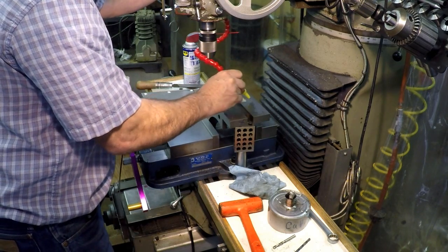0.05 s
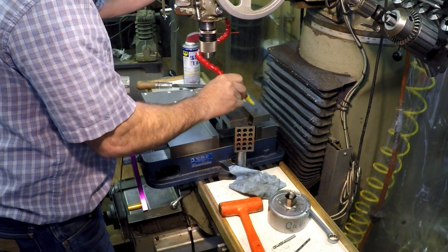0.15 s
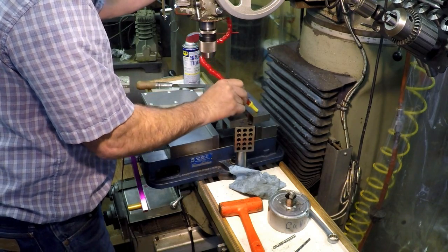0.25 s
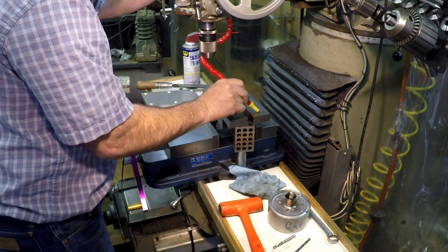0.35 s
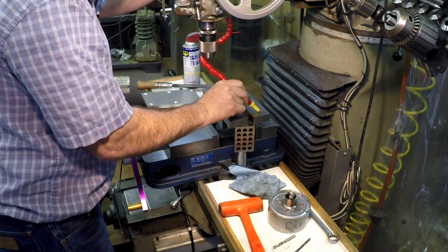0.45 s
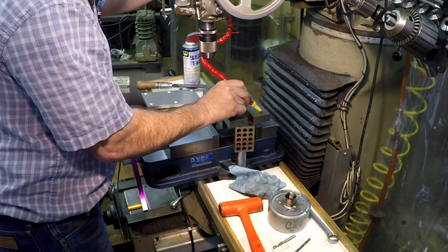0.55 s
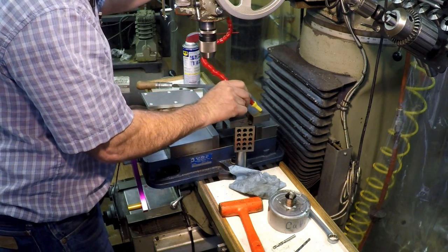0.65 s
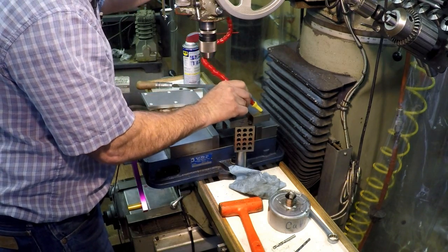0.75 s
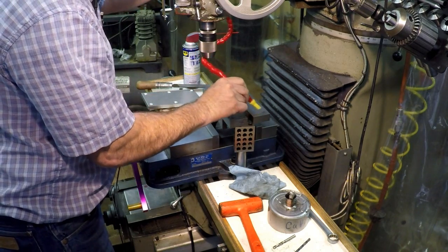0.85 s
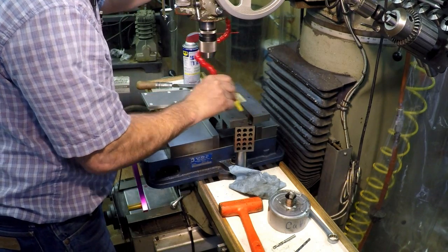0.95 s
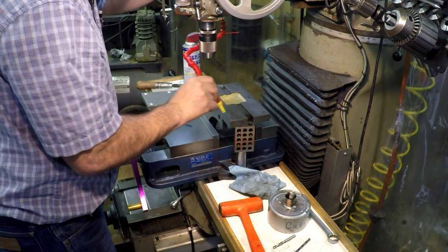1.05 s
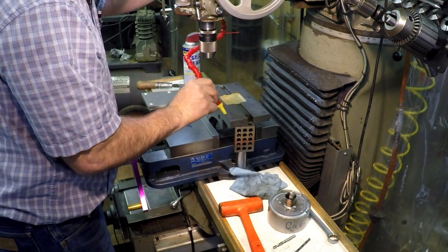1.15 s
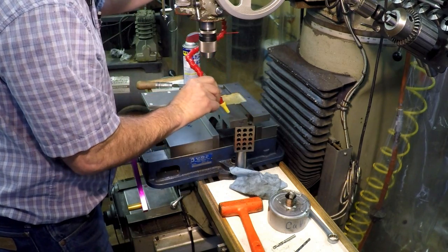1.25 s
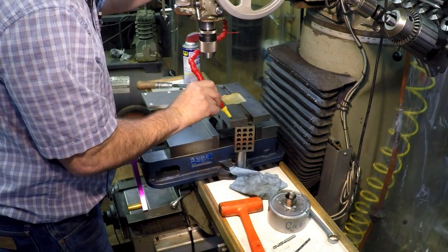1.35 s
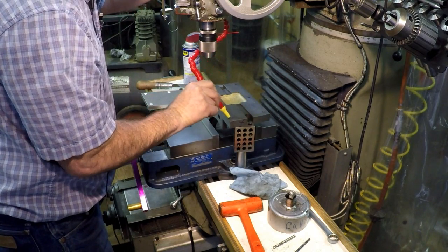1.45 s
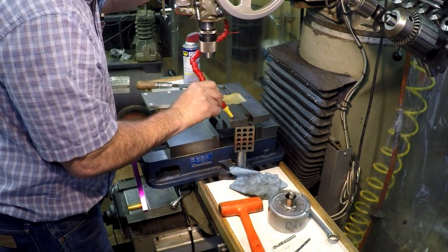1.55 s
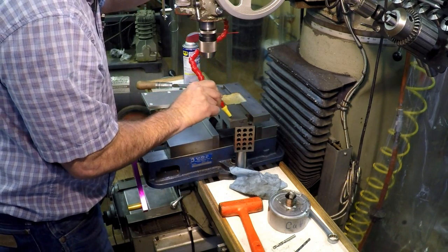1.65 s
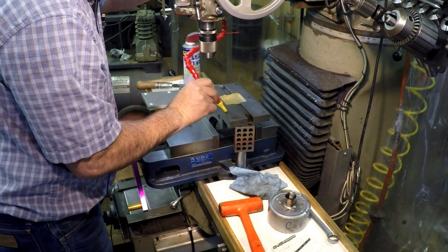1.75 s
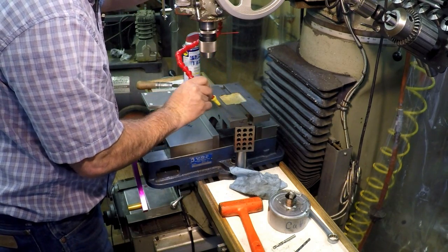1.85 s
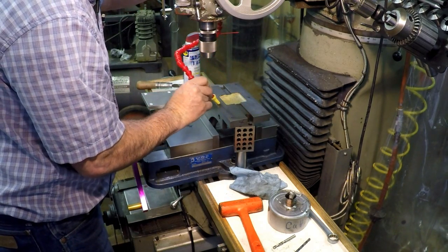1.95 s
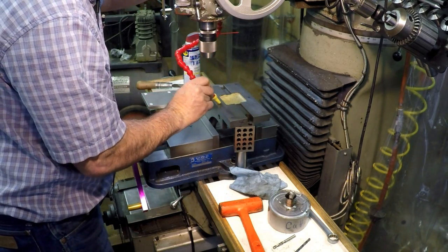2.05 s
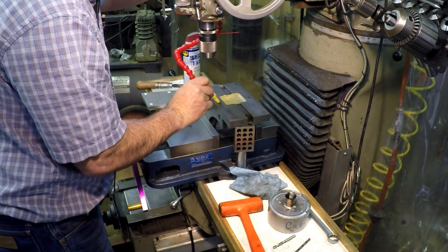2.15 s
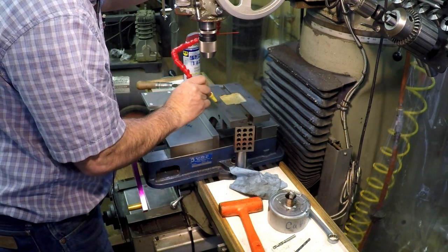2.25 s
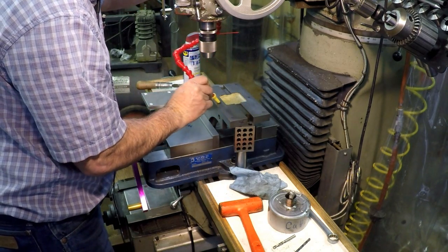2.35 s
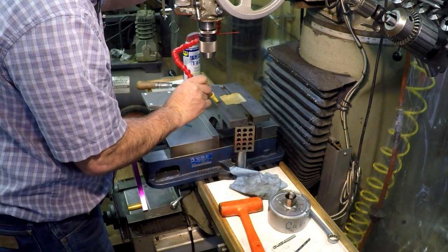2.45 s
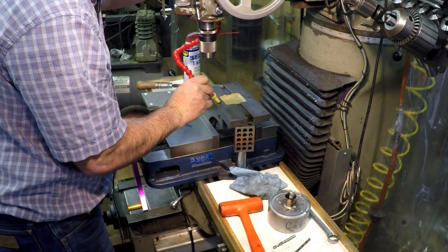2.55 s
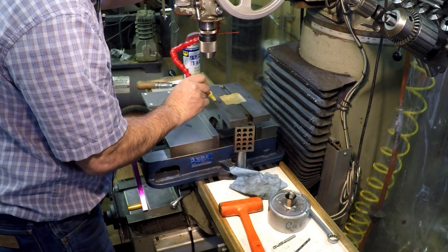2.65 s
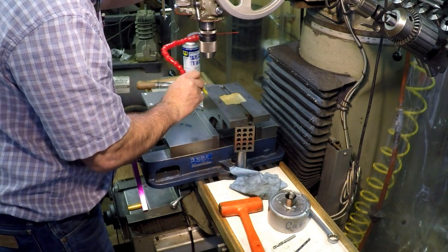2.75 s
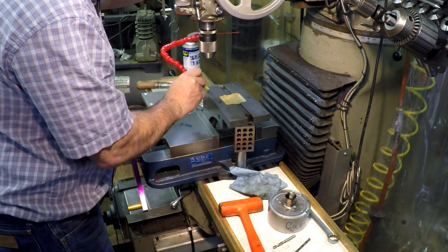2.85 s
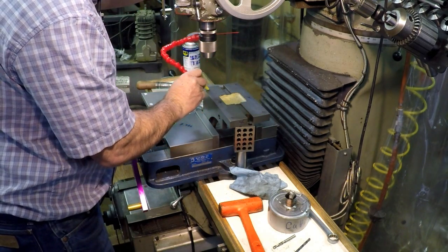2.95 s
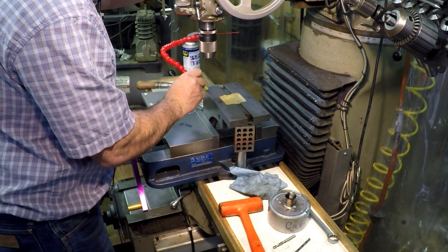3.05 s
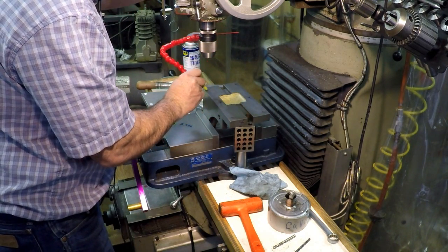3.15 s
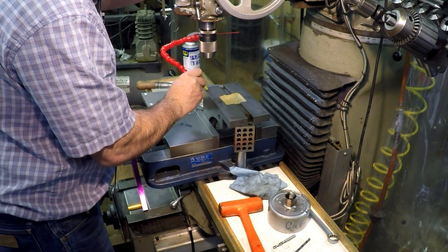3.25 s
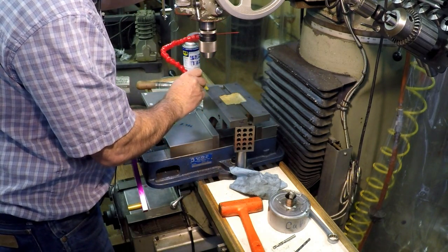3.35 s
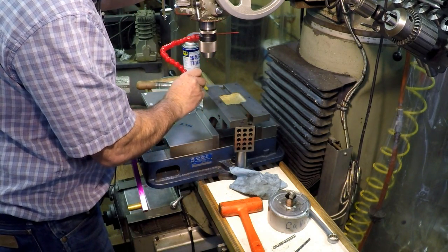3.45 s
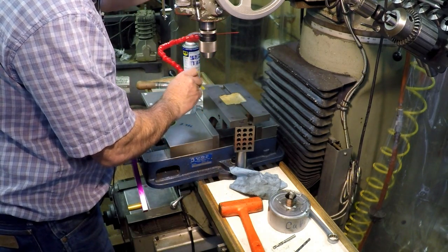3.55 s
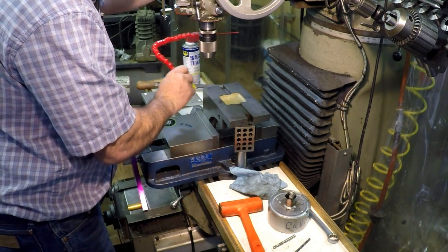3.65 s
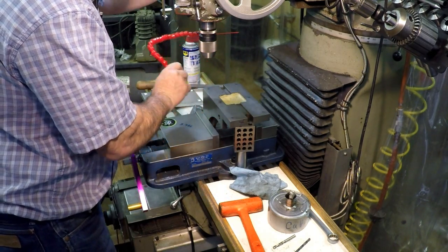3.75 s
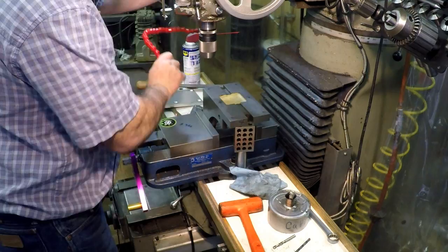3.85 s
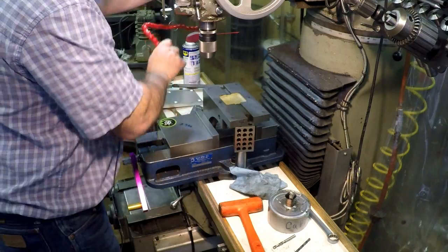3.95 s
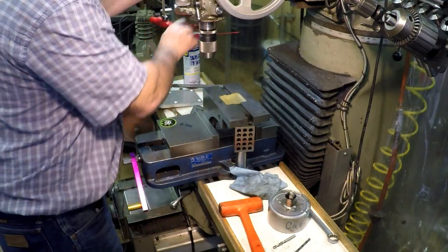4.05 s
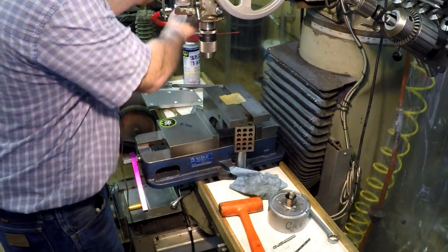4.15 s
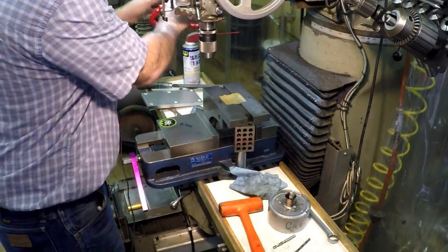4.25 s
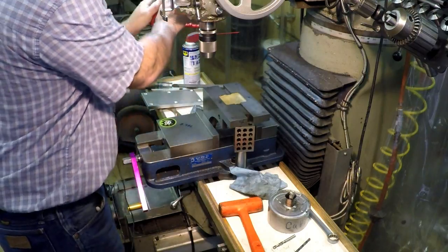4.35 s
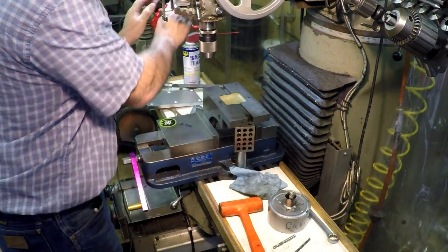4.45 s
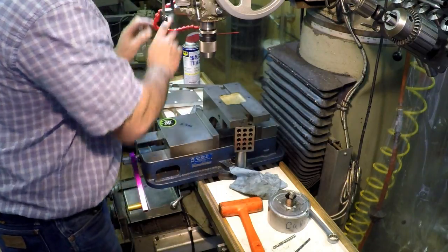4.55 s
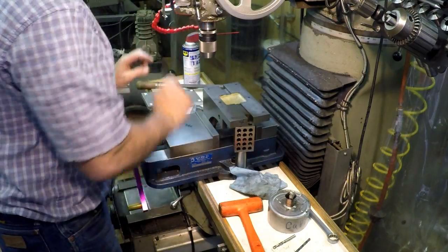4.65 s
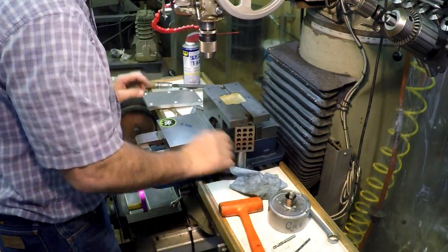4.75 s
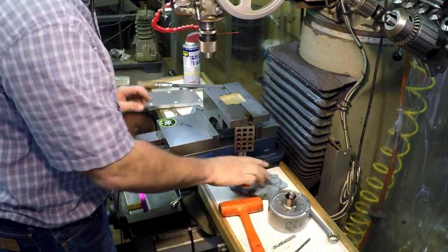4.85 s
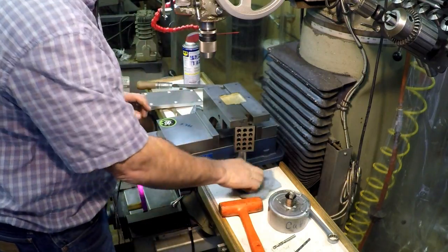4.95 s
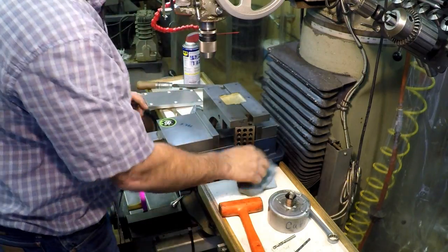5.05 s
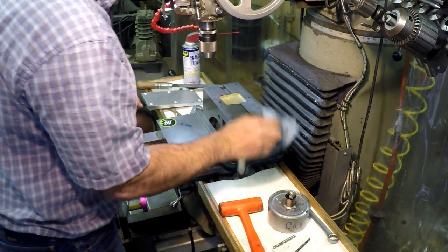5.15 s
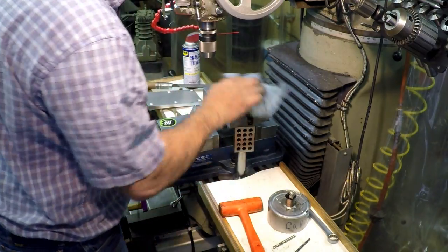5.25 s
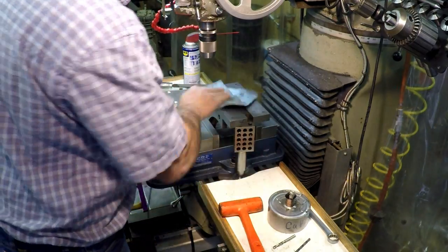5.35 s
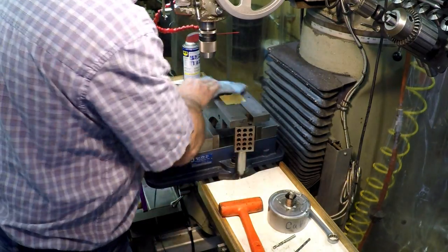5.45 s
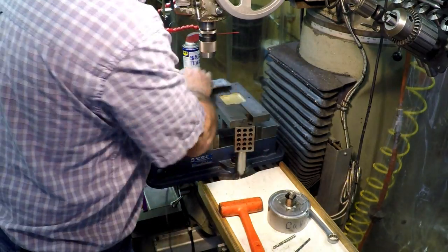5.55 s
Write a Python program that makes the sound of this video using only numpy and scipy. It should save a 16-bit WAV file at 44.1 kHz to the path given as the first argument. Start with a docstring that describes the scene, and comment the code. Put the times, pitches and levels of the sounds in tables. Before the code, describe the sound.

An air nozzle blows in hissing, whistling sweeps across a metal block, followed by plastic hose clicks over faint workshop hum.

```python
"""A machine shop, one mono microphone close enough to the work to catch stray air. A nozzle on a jointed
plastic hose sweeps four times over a drilled steel block. The jet hisses, sizzles on edges, and whistles
near 6 kHz whenever it crosses a hole. The air is shut off, the hose snaps and creaks as it is bent away,
and a rag is snatched from a wooden tray. Shop rumble and mains hum lie underneath."""
import sys
import numpy as np
from scipy import signal
from scipy.fft import rfft, irfft
from scipy.io import wavfile
from scipy.ndimage import uniform_filter1d

SR = 44100
rng = np.random.default_rng(int(sys.argv[2]) if len(sys.argv) > 2 else 0)


def wav_out(sig):
    """Save sig, one row per channel (or a flat mono array), as 16-bit PCM at SR to the path in sys.argv[1]."""
    wavfile.write(sys.argv[1], SR, np.round(np.clip(np.atleast_2d(sig).T, -1, 1) * 32767).astype(np.int16))


N = 247396
T = np.arange(N) / SR

# the jet swells and sinks with each sweep: t/s, rush level/dB, sizzle level/dB, wash level/dB
JET_LEVELS = [(0, -39, -25, -54.5), (.15, -39, -28, -57.5), (.31, -33.5, -33.5, -44), (.4, -35, -34, -47.5),
              (.58, -37.5, -26, -57), (.81, -56.5, -44, -82), (1.03, -57, -51, -70),
              (1.125, -49.5, -47.5, -58.5), (1.45, -42.5, -34, -53.5), (1.62, -43.5, -35, -55),
              (1.7, -53.5, -39.5, -67.5), (1.97, -53.5, -48.5, -64), (2.21, -45, -34, -64),
              (2.45, -43, -32, -55), (2.48, -50, -35, -70), (2.86, -50, -41, -62),
              (2.91, -50.5, -48.5, -47.5), (3.25, -41, -33.5, -47), (3.41, -53, -39.5, -56),
              (3.72, -54, -42.5, -66)]
# spectra of the free rush, the sizzle and the low wash over the vise: f/Hz, level/dB
RUSH_SPECTRUM = [(300, -35), (900, -13.5), (1550, -4), (2300, -7.5), (3400, -1), (4500, 1.5), (6000, -6),
                 (8500, 1), (10500, -4), (12500, -3.5), (15000, -2)]
SIZZLE_SPECTRUM = [(1500, -49), (3500, -20), (4700, -7), (5700, 3.5), (6700, -0.5), (7400, -1), (8600, -4),
                   (10500, -16.5), (15000, -16)]
WASH_SPECTRUM = [(60, -18), (200, -8), (400, -2.5), (900, 0.5), (1400, -6), (2200, -12), (4000, -27.5)]
# resonances of the holes and slots, and of the gap between the vise jaws: f/Hz, width/Hz, level/dB
SLOT_MODES = [(1583, 86, -17), (2653, 98, -14), (3445, 160, -13.5), (4960, 59, -10.5), (7215, 63, -9)]
GAP_MODES = [(416, 31, -13), (729, 140, -12.5), (1244, 120, -4.5), (1300, 48, -3), (1483, 58, -1.5),
             (2686, 170, -26.5), (3510, 190, -6), (5350, 120, -5)]
# the jet strikes a steel edge, or blows into the gap: t/s, length/s, level/dB
EDGE_STRIKES = [(-0.02, 0.12, -24.5), (0.393, 0.26, -32.5), (0.984, 0.022, -35.5), (1.271, 0.028, -39),
                (1.717, .088, -27), (2.719, 0.048, -24)]
GAP_BLOWS = [(2.985, .285, -38.5), (3.281, 0.438, -55)]
# room tone of the shop: f/Hz, level/dB
SHOP_SPECTRUM = [(10, -6.5), (27, 13.5), (60, -10.5), (125, -12), (280, -17), (700, -21.5), (1200, -23.5),
                 (1500, -21.5), (2400, -28), (8000, -31.5), (11500, -38.5), (15000, -35.5)]
# its slow rise and fall: t/s, level/dB
SHOP_LEVEL = [(0, -57.5), (0.6, -58.5), (1.0, -66), (2.0, -62.5), (3.0, -59), (3.85, -61), (4.2, -58),
              (5.6, -57)]
# stray air on the microphone: t/s, level/dB, half length/s
BUFFETS = [(0.303, -61, 0.09), (0.805, -55, 0.093), (1.726, -56, 0.04)]
# the jet runs off the block at the end of a sweep: t/s, half length/s
RUN_OFFS = [(.39, 0.054), (1.97, 0.063), (2.93, 0.067)]
# the jet lingers on a hole, one curve for each held whistle: t/s, f/Hz, level/dB
HOLDS = [
    [(.44, 5240, -26.5), (.57, 5510, -20), (.64, 5827, -12.5), (.69, 5854, -12.5), (.755, 6240, -10),
     (.81, 6240, -13.5), (.875, 6172, -14), (.93, 6310, -23.5), (.985, 6303, -21.5)],
    [(3.16, 5790, -36), (3.2, 6050, -23.5), (3.32, 5850, -14), (3.41, 6088, -11.5), (3.5, 6090, -14),
     (3.55, 6070, -18), (3.59, 6089, -10), (3.695, 5968, -17.5), (3.72, 5790, -19.5)],
]
# the jet creeps over a hole: t/s, length/s, first f/Hz, last f/Hz, first level/dB, last level/dB
CLIMBS = [(1.425, .13, 5220, 6050, -24, -23.5), (1.613, .084, 5277, 6239, -19, -9.5)]
# the jet flicks across a hole: t/s, length/s, level/dB, f/Hz, glide/(Hz/s)
CHIRPS = [(0.511, 0.0054, -14.5, 5376, -6), (.623, 0.0047, -9, 5820, -0.5),
          (1.495, 0.0089, -16, 5630, 5998), (1.532, 0.0069, -10.5, 5986, 5998.5),
          (1.559, .026, -12, 5596, -8000), (1.652, .007, -8.5, 5730, 9999.5),
          (1.726, 0.017, -9.5, 5870, 0.5), (1.836, 0.028, -16.5, 5840, -18000),
          (2.268, 0.012, -12, 5680, 6002), (2.358, .007, -10.5, 5830, -34000),
          (2.47, 0.024, -10, 5880, 24001.5), (2.581, 0.023, -11, 5893, -17000),
          (2.679, 0.021, -12, 5780, 16999), (2.788, .01, -11, 5887, -30000),
          (3.09, .015, -28.5, 5290, 3997), (3.207, 0.0069, -9, 6007, -0.5),
          (3.246, 0.0054, -10, 5980, -0.5), (3.261, 0.0058, -11.5, 5964, 0), (3.297, 0.015, -9, 5874, 1.5),
          (3.344, .013, -9.5, 5935, 1)]
# hose joints snap: t/s, level/dB
SNAPS = [(3.958, -24.5), (4.049, -29.5), (4.116, -31), (4.163, -28.5), (4.2, -28.5), (4.389, -43),
         (4.478, -44), (4.542, -40.5), (4.627, -47), (4.806, -57.5), (5.074, -50)]
# spectrum of a hard snap: f/Hz, level/dB
CRACK_SPECTRUM = [(200, -23), (900, -23.5), (1800, -3.5), (2700, -2), (4000, 4.5), (6500, -1), (8500, 1.5),
                  (11000, -7), (15000, -18)]
# modes of the hollow hose: f/Hz, t60/s, level/dB
HOSE_MODES = [(325.4, 0.064, -0.5), (418.4, 0.086, 4.5), (554, 0.022, -3), (852, 0.049, 3.5),
              (960, 0.021, 6), (1105, 0.031, 4.5), (1257, .04, 1), (1456, 0.048, 0.5), (2136, 0.018, 4.5),
              (2460, .015, -4), (3080, 0.019, -7), (4420, .02, 0)]
# the joints creak as they bend: t/s, length/s, level/dB
CREAKS = [(3.959, 0.0038, -44), (4.055, .005, -46), (4.118, 0.19, -45), (4.387, 0.18, -48.5),
          (4.62, .005, -54)]
# faint squeaks: t/s, level/dB, half length/s, f/Hz
SQUEAKS = [(4.863, -57, .045, 1530), (4.951, -58.5, 0.048, 1510), (5.372, -58, 0.019, 1490)]
# the rag rustles: t/s, level/dB, half length/s
RUSTLES = [(5.129, -62.5, 0.046), (5.3, -73, 0.049), (5.424, -68.5, 0.037), (5.588, -53.5, 0.071)]
# spectrum of rubbing cloth: f/Hz, level/dB
CLOTH_SPECTRUM = [(100, -9), (600, -2), (1600, 1.5), (4500, 0), (8500, -3), (11000, -14.5), (15000, -22.5)]
# reverberation of the shop: f/Hz, t60/s
ROOM_DECAY = [(200, .4), (1000, 0.55), (4000, 0.17), (6000, 0.37), (10000, 0.38), (15000, 0.152)]


def amp(db):
    return 10 ** (np.asarray(db) / 20)


def unit(x):
    return x / np.sqrt(np.mean(abs(x) ** 2) + 1e-20)


def at_hz(points, hz):
    """A table read along a log-frequency axis."""
    f, value = np.transpose(points)
    return np.interp(np.log(hz + 1), np.log(f + 1), value)


def track(rows, column=1):
    """One column of a curve at every sample."""
    rows = np.array(rows)
    return np.interp(T, rows[:, 0], rows[:, column])


def level(rows, release_s, column):
    """A dB column as a gain, dying away outside its span."""
    outside = np.maximum(rows[0][0] - T, T - rows[-1][0]).clip(0)
    return amp(track(rows, column)) * np.exp(-outside / release_s)


def bell(s, half):
    return np.exp(-((T - s) / half) ** 2)


def gate(start, length, rise_s, fall_s):
    """Attack, hold and release."""
    return np.clip((T - start) / rise_s, 0, 1) * np.exp(-np.maximum(T - start - length, 0) / fall_s)


def gates(rows, rise_s, fall_s):
    """One gate for each event, summed at their levels."""
    return sum(amp(db) * gate(s, length, rise_s, fall_s) for s, length, db in rows)


def wander(hz):
    """Complex random drift of rms 1, slower than about hz."""
    z = np.fft.fft(rng.standard_normal(2 ** 18))
    f = np.fft.fftfreq(len(z), 1 / SR)
    z = z * np.exp(2j * np.pi * rng.random(len(z))) / (1 + (f / hz) ** 2)
    return unit(np.fft.ifft(z)[:N])


def hiss(spectrum, band_hz=(20, 16000), patchy_db=0):
    """Noise of a spectrum (f/Hz, level/dB) with eddies drifting through it, rms 1 inside the band."""
    hz = np.fft.rfftfreq(1024, 1 / SR)
    real, imag, eddies = rng.standard_normal((N // 256 + 5, len(hz), 3)).T
    eddies = unit(uniform_filter1d(uniform_filter1d(eddies, size=14, axis=0), size=8, axis=1))
    z = (real + 1j * imag) * amp(at_hz(spectrum, hz)[:, None] + patchy_db * eddies)
    power = (abs(z) ** 2).sum(1)
    share = power[(hz > band_hz[0]) & (hz < band_hz[1])].sum() / power.sum()
    return unit(signal.istft(z, nperseg=1024, noverlap=768)[1][:N]) / np.sqrt(share)


def fuzzy_tone(hz, width_hz):
    """Noise in one narrow resonance."""
    return unit((wander(width_hz) * np.exp(2j * np.pi * hz * T)).real)


def resonances(modes):
    """Air noise ringing a set of cavities."""
    return sum(amp(db) * fuzzy_tone(hz, width) for hz, width, db in modes)


def jet():
    """Turbulent rush, a brighter sizzle where edges cut the jet, a low wash, and the hollow vise."""
    edges = gates(EDGE_STRIKES, rise_s=0.01, fall_s=0.01)
    shut_off_s = 0.026  # the hiss dies this fast when the valve shuts
    rush_gain, sizzle_gain, wash_gain = (level(JET_LEVELS, shut_off_s, column) for column in (1, 2, 3))
    rush = amp(-0.6) * hiss(RUSH_SPECTRUM, (2000, 4300), patchy_db=2.55) + resonances(SLOT_MODES)
    rush *= rush_gain + amp(-25) * edges
    sizzle = amp(-2) * np.hypot(sizzle_gain, edges) * hiss(SIZZLE_SPECTRUM, (7000, 10000), patchy_db=3)
    wash = amp(-3.5) * wash_gain * hiss(WASH_SPECTRUM, (300, 1000), patchy_db=1.5)
    hollow = gates(GAP_BLOWS, rise_s=0.052, fall_s=0.016) * unit(resonances(GAP_MODES))
    sputter = amp(0.77 * wander(45).real)
    return (rush + sizzle + wash + hollow) * sputter


def shop():
    """Room tone: rumble, mains hum, and a thin electrical whine that pips once every mains cycle."""
    mains = 2 * np.pi * 60 * T
    hum = amp(-8.5) * np.sin(2 * mains)
    pips = ((1 + np.cos(mains)) / 2) ** 5
    whine = amp(-9) * pips * np.sin(2 * np.pi * 12796 * T)
    return amp(track(SHOP_LEVEL)) * (hiss(SHOP_SPECTRUM, patchy_db=1.7) + hum + whine)


def buffets():
    """Gusts of stray air thump on the microphone."""
    gusts = sum(amp(db) * bell(s, half) for s, db, half in BUFFETS)
    thump = hiss([(10, 5.5), (30, 1), (55, -8), (90, -17.5), (200, -17.5), (350, -47), (1000, -74)])
    return gusts * thump


def run_off(x, centre_hz=11200, half_width_hz=1300, dip_db=-8):
    """A band of the treble sinks while the jet is off the block."""
    hz = np.fft.rfftfreq(N, 1 / SR)
    band = irfft(rfft(x) * np.exp(-0.5 * ((hz - centre_hz) / half_width_hz) ** 2), N)
    off_block = sum(bell(s, half) for s, half in RUN_OFFS)
    return x + band * (amp(dip_db * off_block) - 1)


def hold(curve, sag_hz_per_s=20000, lowest_hz=4970):
    """Pitch and gain while the jet lingers on a hole; the pitch sags as the whistle dies."""
    sag = sag_hz_per_s * np.maximum(T - curve[-1][0], 0)
    return np.maximum(track(curve) - sag, lowest_hz), level(curve, release_s=0.01, column=2)


def whistle(passes, lock_db=25.5, lock_spread_db=5.5):
    """An edge tone: breathy while the jet grazes a hole, clean once it stands well over the rush."""
    pitches, gains = np.transpose(passes, (1, 0, 2))
    hz = pitches[gains.argmax(0), np.arange(N)]  # the strongest pass sets the pitch
    stalls = sum(bell(start - 0.003, 0.0034) for start, *_ in CHIRPS)  # just before a chirp catches
    gain = gains.max(0) * amp(-7 * stalls)
    over_rush_db = 20 * np.log10(gain + 1e-9) - track(JET_LEVELS)
    breathy = 1 / (1.5 + np.exp((over_rush_db - lock_db) / lock_spread_db))
    jitter_hz = 150 * breathy * wander(140).real
    carrier = np.exp(2j * np.pi * np.cumsum(hz + jitter_hz) / SR)
    skirt = 1.54 * breathy  # the band widens as the lock loosens
    fuzz = (wander(170) + skirt * wander(390)) / np.hypot(1, skirt)
    tone = gain * carrier * (1 - breathy + breathy * fuzz) / np.hypot(1 - breathy, breathy)
    octave = amp(-23) * tone ** 2 * (1 + 0.7 * wander(160))
    return np.sqrt(2) * (tone + octave).real


def chirp(start, length, db, hz, glide, lowest_hz=4970, highest_hz=6470):
    """Pitch and gain of a quick crossing: a brief tone inside a faint graze of the rim."""
    middle = start + length / 2
    swing = glide * (T - middle)
    reach = np.maximum(np.where(swing > 0, highest_hz - hz, hz - lowest_hz), 1)
    pitch = hz + reach * np.tanh(swing / reach)  # the glide levels off at either limit
    caught = gate(start, length, rise_s=0.003, fall_s=0.00669)
    graze = amp(-12.5) * bell(middle + 0.004, 0.038)
    return pitch, amp(db) * np.maximum(caught, graze)


def climb(start, length, first_hz, last_hz, first_db, last_db):
    """Pitch and gain rise evenly as the jet centres on the hole."""
    ramp = [(start, first_hz, first_db), (start + length, last_hz, last_db)]
    return track(ramp), level(ramp, release_s=0.009, column=2)


def hose_ring(slips):
    """Each slip of a joint rings the hollow hose; the soft plastic rounds off the treble."""
    t = T[:SR // 4]
    ring = sum(amp(db - 60 * t / t60) * np.cos(2 * np.pi * hz * t) for hz, t60, db in HOSE_MODES)
    ring = signal.sosfilt(signal.butter(2, 3300, fs=SR, output="sos"), ring)
    return signal.fftconvolve(slips, ring)[:N]


def hose_snaps():
    """Ball joints slip in single jumps: hard ones crack brightly, soft ones tick."""
    blows = np.zeros(N)
    for s, db in SNAPS:
        blows[round(s * SR)] = amp(db)
    hardness = (blows / blows.max()) ** 0.91
    t = T[:SR // 4]
    burst = (1 - np.exp(-t / 0.0003)) * (np.exp(-t / 0.0018) + 0.14 * np.exp(-t / 0.012))
    crack = signal.fftconvolve(blows * hardness, burst)[:N] * hiss(CRACK_SPECTRUM)
    dull_noise = hiss([(300, -23), (1300, 3), (4500, -1), (9000, -16), (15000, -27)])
    tick = signal.fftconvolve(blows * (1 - hardness), burst)[:N] * dull_noise
    return amp(-2) * crack + amp(-0.5) * tick + amp(-39) * hose_ring(blows)


def hose_creak(slips_per_s=600):
    """A dense run of tiny slips as the joints bend."""
    slips = (rng.random(N) < slips_per_s / SR) * rng.uniform(-0.8, 1, N)
    bending = gates(CREAKS, rise_s=0.0048, fall_s=0.035)
    return amp(-4.5) * bending * unit(hose_ring(slips))


def squeaks():
    """Faint handling squeaks, each a short swell of narrow noise."""
    return sum(amp(db) * bell(s, half) * fuzzy_tone(hz, width_hz=86) for s, db, half, hz in SQUEAKS)


def tray_knock(start_s=5.102, board_hz=205):
    """The hand knocks dully on the wooden tray."""
    t = np.maximum(T - start_s, 0)
    thud = hiss([(60, -3), (200, -1.5), (500, -17), (1500, -10.5), (4000, -51)])
    board = np.sin(2 * np.pi * board_hz * t) + 0.32 * thud
    return amp(-30.5) * (1 - np.exp(-t / 0.015)) * np.exp(-t / 0.018) * board


def rag():
    """Cloth rustles as it is snatched up."""
    return sum(amp(db) * bell(s, half) for s, db, half in RUSTLES) * hiss(CLOTH_SPECTRUM, patchy_db=1.5)


def room(x, wet_db, near_db):
    """Close machine faces throw single echoes; the shop adds a tail that dies sooner in the treble."""
    hz, t, z = signal.stft(rng.standard_normal(SR * 3 // 4), SR, nperseg=256)
    tail = signal.istft(z * amp(-60 * t / at_hz(ROOM_DECAY, hz)[:, None]), SR, nperseg=256)[1]
    tail *= 1 - np.exp(-T[:len(tail)] / 0.0021)
    response = amp(wet_db) * tail / np.linalg.norm(tail)
    delays = (SR * rng.uniform(0.001, 0.016, size=8)).astype(int)
    response[delays] += amp(near_db) * rng.choice([-1, 1], len(delays)) / np.sqrt(len(delays))
    response[0] += 1  # direct path to the microphone
    return signal.fftconvolve(x, response / np.linalg.norm(response))[:N]


def scene():
    """Air and handling with their echoes, over buffets and room tone, alike in both channels."""
    passes = [hold(curve) for curve in HOLDS]
    passes += [climb(*row) for row in CLIMBS] + [chirp(*row) for row in CHIRPS]
    whistles = whistle(passes)
    air = room(run_off(jet()), wet_db=-11, near_db=-10) + room(whistles, wet_db=-11, near_db=-17)
    handling = hose_snaps() + hose_creak() + squeaks() + tray_knock() + rag()
    mono = air + room(handling, wet_db=-7, near_db=-8) + buffets() + shop()
    return np.array([mono, mono])


def record(dry):
    """A mono microphone with a steep band limit."""
    cutoff_hz = 15500
    lowpass = signal.firwin(511, cutoff_hz, window=("kaiser", 10), fs=SR)
    return signal.oaconvolve(dry, lowpass[None], "same")


dry = scene()
out = record(dry)
wav_out(out)
```